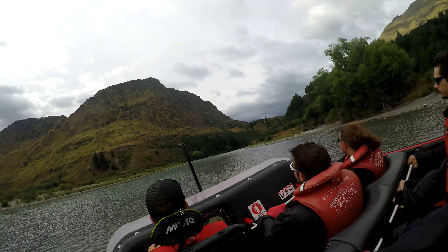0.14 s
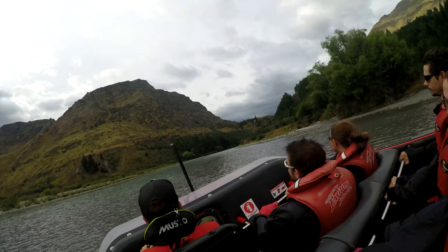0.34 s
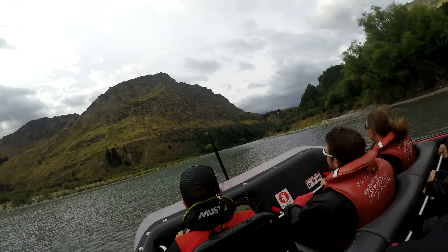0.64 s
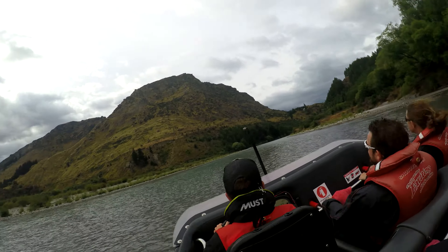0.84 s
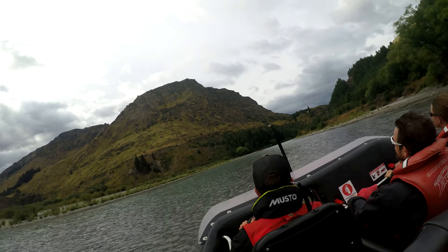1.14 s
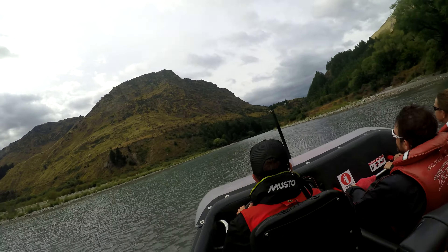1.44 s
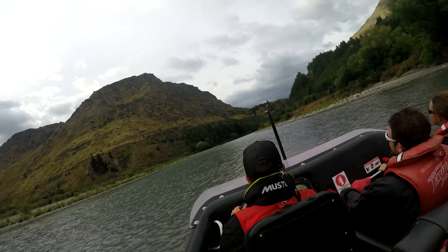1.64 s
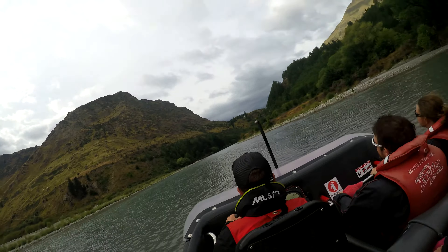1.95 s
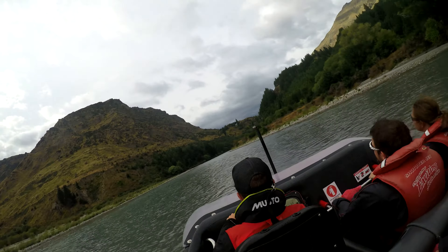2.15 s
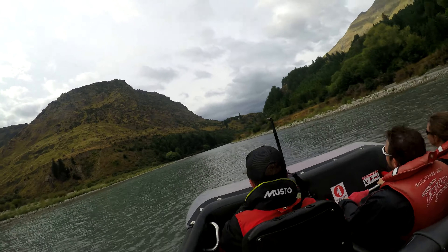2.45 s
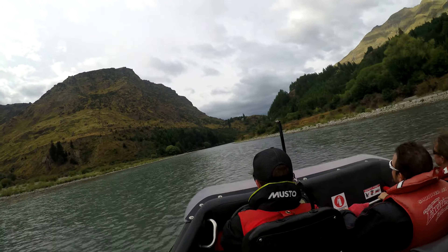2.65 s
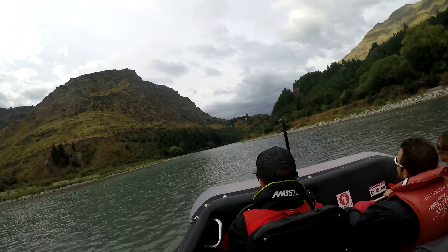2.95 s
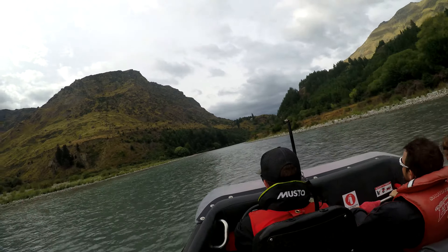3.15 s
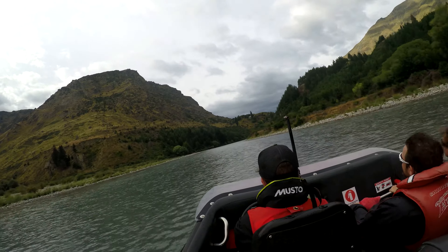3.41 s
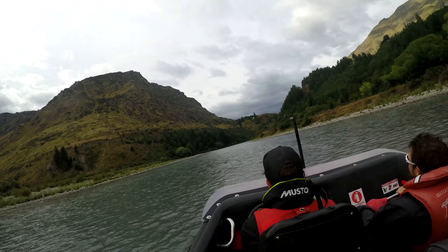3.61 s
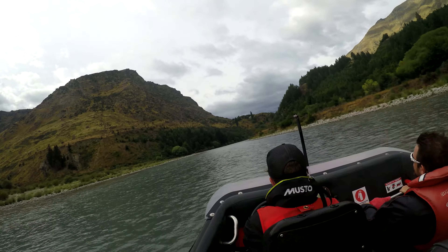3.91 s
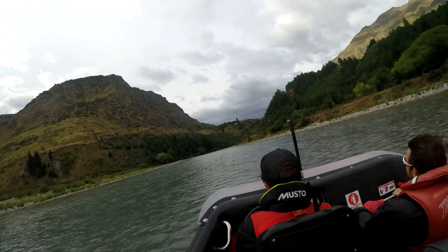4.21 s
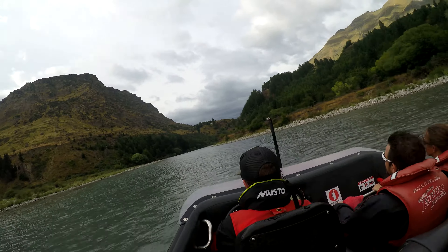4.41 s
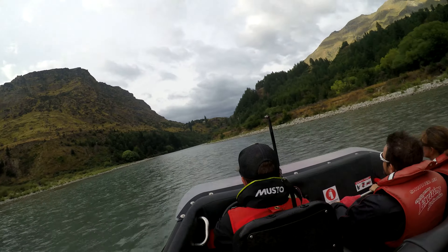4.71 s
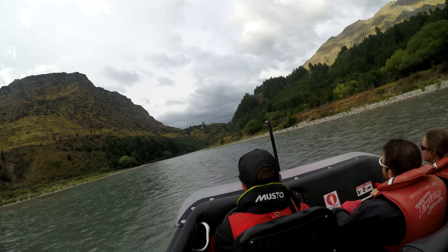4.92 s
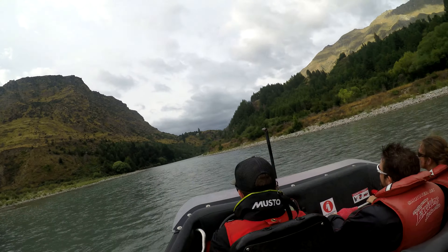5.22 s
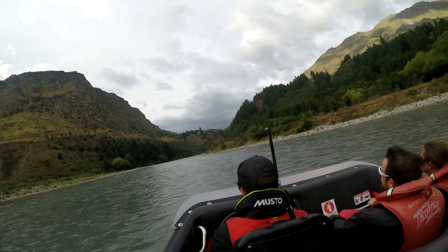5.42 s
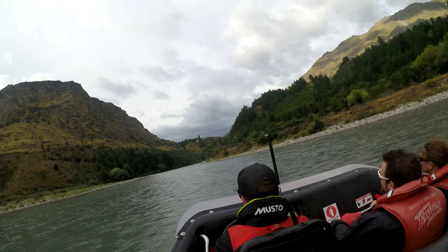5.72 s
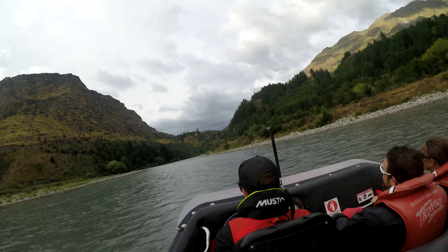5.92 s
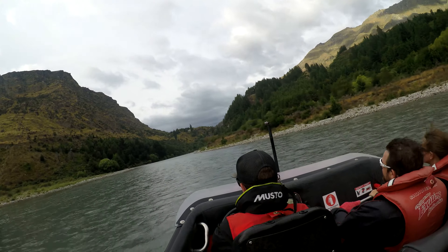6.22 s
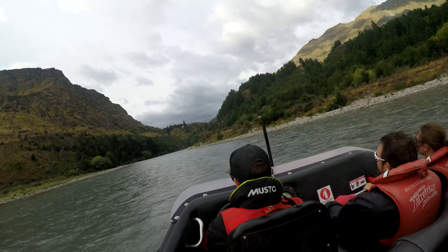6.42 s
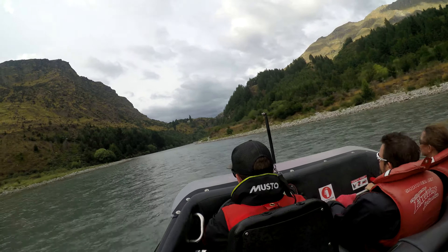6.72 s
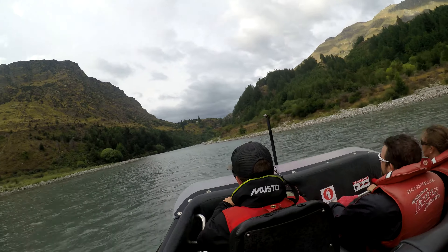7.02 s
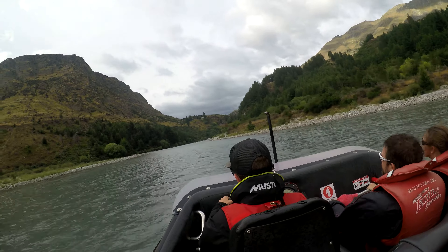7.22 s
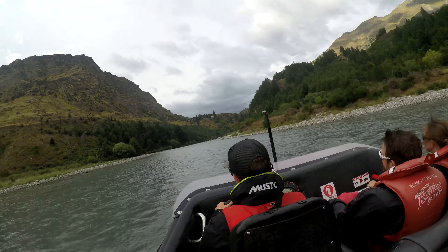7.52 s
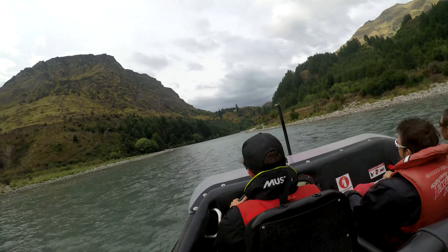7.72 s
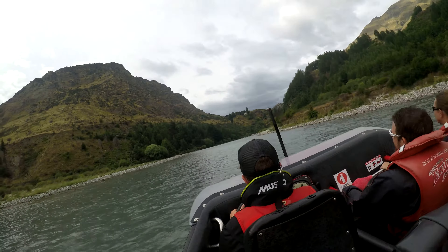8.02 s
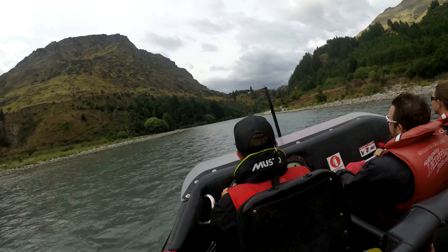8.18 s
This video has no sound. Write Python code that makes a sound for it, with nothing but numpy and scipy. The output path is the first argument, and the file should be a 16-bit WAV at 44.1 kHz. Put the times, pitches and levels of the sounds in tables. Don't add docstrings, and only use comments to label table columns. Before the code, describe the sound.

A boxed camera microphone near a boat engine is battered by headwind on open water. Low thumps and irregular slaps never stop, while breathy hiss first stutters with a thin high whistle, then streams evenly with frequent hollow pops, and finally breaks up and fades. A steady low engine drone swells mid-way behind it, with dull rushing water. Mono, close, slightly squashed by limiting.

```python
import sys
import numpy as np
from scipy import signal
from scipy.fft import rfft, irfft, next_fast_len
from scipy.io import wavfile
from scipy.ndimage import uniform_filter1d, minimum_filter1d, map_coordinates

SR = 44100
rng = np.random.default_rng(int(sys.argv[2]) if len(sys.argv) > 2 else 0)


def store_wav(level_fs):
    pcm = np.round(np.clip(np.atleast_2d(level_fs), -1, 1) * 32767)
    wavfile.write(sys.argv[1], SR, pcm.T.astype(np.int16))


def natural_amplitude(level_db):
    exponent = np.asarray(level_db, float) / 20
    return 10 ** exponent


N = 368235

# (time [s], thump level [dB])
HEADWIND = [(0, -14), (1.6, -13.5), (1.8, -17), (2.25, -15.5), (2.65, -18.5), (3.5, -15), (4.1, -17),
            (4.4, -14), (5.1, -15.5), (5.8, -13), (7.2, -13.5), (8.35, -14.5)]
# (time [s], length [s], change [dB])
SLACKS = [(1.61, 0.03, -1), (2.48, 0.057, -7), (3.77, 0.056, -7), (3.91, 0.059, -2.5), (4.23, .08, -4.5),
          (4.37, 0.032, -5), (4.49, 0.033, -8), (4.772, 0.062, -8), (5.32, .05, -8), (5.445, 0.035, -13),
          (5.53, 0.029, -8), (5.743, 0.02, -5.5), (5.912, 0.092, -11), (6.121, 0.041, -10.5),
          (6.23, 0.036, -6), (7.92, .04, -4), (8.026, 0.035, -14), (8.231, 0.025, -6)]
# (frequency [Hz], density [dB per Hz])
THUMP_SPECTRUM = [(8, -2), (20, 0.5), (36, 7.5), (60, 5.5), (90, -3), (150, -18.5), (300, -62.5),
                  (1000, -120)]
# (frequency [Hz], gain [dB])
THUMP_TOP = [(100, -6.5), (200, 0), (1000, -65)]
# (frequency [Hz], density [dB per Hz])
FLAP_SPECTRUM = [(50, -19.5), (90, -0.5), (150, -4.5), (250, -9), (350, -16.5), (600, -24.5), (1500, -35.5),
                 (5000, -120)]

# (time [s], hiss level [dB])
STREAM = [(0.0, -29.5), (0.5, -30), (0.75, -31.5), (1.0, -29), (1.25, -34), (1.5, -30.5), (2.0, -30.5),
          (2.24, -28.5), (2.49, -31), (3.0, -29.5), (4.24, -29), (4.49, -26), (4.74, -27), (5.49, -27.5),
          (6.49, -30), (7.73, -30), (7.98, -38.0), (8.3, -42.5)]
# (time [s], length [s], change [dB])
LULLS = [(0.073, 0.014, -7.5), (0.156, 0.037, -15), (0.224, 0.044, -10), (0.315, 0.029, -6),
         (0.427, 0.04, -5), (0.526, 0.027, -8.3), (0.732, 0.062, -10), (0.994, 0.015, -13),
         (1.019, 0.037, -8.9), (1.123, 0.055, -9.5), (1.233, 0.042, -12), (1.296, 0.023, -4.5),
         (1.337, 0.039, -10), (1.426, 0.015, -6), (1.542, 0.014, -8.5), (3.762, 0.018, -6.5),
         (0.664, 0.045, -4.5), (6.074, 0.016, -6.5), (6.487, 0.012, -7), (6.878, 0.014, -17),
         (7.174, 0.021, -10), (7.259, 0.037, -12), (7.355, 0.028, -7.5), (7.445, 0.086, -15.5),
         (7.742, 0.012, -5), (7.774, 0.015, -12), (7.827, 0.031, -9), (7.921, 0.045, -14),
         (7.975, 0.097, -9.5), (8.16, 0.083, -6)]
# (time [s], length [s], rise [dB])
GUSTS = [(0.62, 0.032, 6.5), (0.718, 0.019, 5), (0.775, 0.018, 12), (0.864, 0.07, 6), (1.212, 0.023, 8.5),
         (1.32, 0.0045, 4), (1.373, 0.017, 5.5), (1.458, 0.018, 4), (2.103, 0.0088, 6), (3.1, 0.043, 2.5),
         (4.326, 0.041, 4), (7.486, 0.023, 15.5), (7.698, 0.0077, 10), (7.773, 0.016, 7.5),
         (7.855, 0.019, 11.5), (7.96, 0.026, 6), (8.07, 0.015, 6.5), (8.138, 0.0076, 14.5),
         (8.279, 0.028, 10)]
# (frequency [Hz], density [dB per Hz])
HISS_SPECTRUM = [(150, -4.5), (350, 3.5), (700, -1.5), (1100, -3), (2200, -4.5), (2600, -10), (4000, -12.5),
                 (6000, -16.5), (6500, -23.5), (8050, -29.5), (11600, -40.5), (12700, -41), (14100, -44),
                 (15000, -55)]
# (frequency [Hz], width [Hz], gain [dB])
SHELL_MODES = [(1410, 68, 7), (1735, 213, 4), (2096, 114, 2.5), (3250, 400, 1.5), (5730, 380, 0.5),
               (7160, 720, 5), (8300, 300, -14)]
# (time [s], gain [dB])
SLOT_GAIN = [
    (0, 11.5),
    (1.05, 8.5),
    (1.4, 7.5),
    (2, 5),
    (5, 6),
    (7, 5.5),
    (7.6, 11),
    (7.9, 9),
    (8.35, 8),
]
# (frequency [Hz], width [Hz])
SLOT_MODE = (4810, 265)
# (frequency [Hz], width [Hz], gain [dB])
RIM_MODES = [(4410, 147, 4.5), (5390, 245, 5)]

# (frequency [Hz], width [Hz])
CAVITY = (920, 46.5)
# (time [s], peak level [dB], pitch [Hz], length [s])
PUFFS = [(0.251, -17.5, 918, 0.044), (0.893, -16, 915, 0.014), (1.099, -11.5, 929, 0.017),
         (1.449, -10.5, 909, 0.0091), (1.57, -15, 925, 0.031), (1.668, -11, 930, 0.0084),
         (3.088, -9.5, 870, 0.0063), (3.426, -8.5, 908, 0.013), (3.851, -12, 920, 0.021),
         (3.903, -14, 914, 0.024), (4.138, -14.5, 908, 0.011), (4.282, -5, 887.5, 0.0059),
         (4.409, -12.5, 930, 0.015), (4.902, -11.5, 915, 0.014), (4.967, -14, 915, 0.035),
         (5.114, -13.5, 880, 0.009), (5.202, -12, 881, 0.011), (5.272, -12, 914, 0.01),
         (5.476, -8.5, 892, 0.0072), (5.774, -8.5, 917, 0.011), (5.837, -8.5, 895, 0.0088),
         (5.917, -11, 915, 0.0073), (6.036, -12.5, 910, 0.011), (6.261, -11.5, 929, 0.01),
         (6.345, -10, 920, 0.0076), (6.514, -14.5, 942, 0.021), (6.753, -10.5, 903, 0.0079),
         (6.802, -11, 925, 0.01), (7.037, -15.5, 914, 0.034), (7.758, -11.5, 904, 0.0082)]
# (time [s], peak level [dB], pitch [Hz], length [s])
FLECKS = [
    (0.844, -18, 1464, .015),
    (2.192, -20.5, 1410, .015),
    (3.369, -16, 1730, 0.013),
    (7.54, -22.5, 1424, 0.019),
]
# (time [s], peak level [dB])
WHIFFS = [(.36, -23), (.44, -17), (2.553, -16.5), (2.702, -26), (3.19, -27), (3.265, -15), (3.371, -15),
          (3.463, -18), (3.725, -18), (4.213, -18), (4.33, -17), (4.519, -14), (4.558, -14.5), (4.617, -16),
          (4.79, -18), (4.848, -15.5), (5.163, -13), (5.234, -14), (5.357, -14), (5.394, -15.5),
          (5.709, -16.5), (5.957, -16.5), (6.154, -15), (6.309, -14.5), (6.988, -16.5), (7.414, -13.5),
          (7.472, -16), (7.655, -24), (7.693, -18), (7.898, -16)]

# (time [s], shaft rate [Hz], level [dB])
ENGINE = [
    (0, 67.5, -32),
    (1, 67.7, -29.5),
    (2, 67.13, -28.5),
    (3, 67.24, -24.5),
    (4, 66.6, -27),
    (5, 66.54, -28.5),
    (6, 67, -30.5),
    (7, 66.5, -38),
    (8.35, 66.63, -30),
]
# (multiple of shaft rate, level [dB])
SHAFT_ORDERS = [(.5, 7.5), (1, 3), (1.5, -6.5), (2, -1), (3, -7.5), (3.5, -9), (4, -10), (5, -21.5),
                (7, -13)]
# (frequency [Hz], density [dB per Hz])
ROAR_SPECTRUM = [(200, -11.5), (400, -7), (1000, -11), (2000, -9), (2600, -20.5), (5000, -30.5),
                 (7000, -42), (10000, -39.5), (15000, -70)]
# (frequency [Hz], density [dB per Hz])
SELF_NOISE_SPECTRUM = [(3000, -30), (7000, 1), (11000, -4), (13500, -9), (15000, -20)]
# (time [s], peak level [dB], pitch [Hz])
JOLTS = [(0.116, -8, 161), (0.281, -8.5, 188), (0.612, -3.5, 165), (1.09, -4, 145), (1.214, -2, 141),
         (1.444, -12, 118), (1.6, -4.5, 111), (2.096, -5.5, 109), (2.264, -3, 175), (2.884, -3.5, 159),
         (3.157, -5, 145), (3.264, -5.5, 135), (3.368, -3, 168), (3.423, -8.5, 123), (3.54, -4, 178),
         (3.78, -6, 110), (3.846, -7, 157), (4.273, -6, 188), (4.323, -0.5, 202), (5.36, -4, 245),
         (5.474, -0.5, 146), (5.945, -5.5, 121), (6.297, -6, 118), (6.755, -6, 146), (6.895, -4, 132),
         (6.973, -1.5, 111), (7.15, -4, 100), (7.442, -13, 150), (7.585, -3.5, 126), (7.687, -1.5, 137)]


def unit(x):
    return x / np.sqrt(np.mean(x ** 2) + 1e-20)


def curves(rows):
    s, *cols = np.transpose(rows)
    return [np.interp(np.arange(N) / SR, s, c) for c in cols]


def wobble(rate):
    knots = rng.standard_normal(int(N * rate / SR) + 4)
    return map_coordinates(knots, [np.arange(N) * rate / SR])


def filtered(x, response):
    m = next_fast_len(N + SR // 2)
    return irfft(rfft(x, m) * response(np.fft.rfftfreq(m, 1 / SR)), m)[:N]


def colour(points):
    f, db = np.transpose(points)
    return lambda hz: natural_amplitude(np.interp(np.log(hz + 1), np.log(f + 1), db))


def mode(hz, width_hz):
    return lambda f: 1j * f * width_hz / (hz * hz - f * f + 1j * f * width_hz)


def patchy(depth_db):
    z = signal.stft(rng.standard_normal(N), nperseg=512)[2]
    field = uniform_filter1d(rng.standard_normal(z.shape), 6, 0)
    field = uniform_filter1d(field, 6, 1)
    return signal.istft(z * natural_amplitude(depth_db * unit(field)), nperseg=512)[1][:N]


def headwind():
    t = np.arange(N) / SR
    level_db = curves(HEADWIND)[0]
    for s, length, db in SLACKS:
        level_db = level_db + db * np.interp(t, [s - length, s, s + length], [0, 1, 0])
    return level_db


def buffet(lumps):
    thump_db = headwind()
    mean_db = thump_db.mean()
    flap_db = mean_db - 6.5 + 0.8 * (thump_db - mean_db) + 1.2 * wobble(14)
    push = unit(filtered(rng.standard_normal(N), colour(THUMP_SPECTRUM)))
    thump = unit(filtered(np.tanh(0.7 * push), colour(THUMP_TOP)))
    small_eddies = filtered(patchy(depth_db=2.0), colour(FLAP_SPECTRUM))
    flap = unit(natural_amplitude(2.0 * lumps + 2.8 * wobble(70)) * small_eddies)
    return natural_amplitude(thump_db + 0.54 * lumps) * thump + natural_amplitude(flap_db) * flap


def eddies():
    t, change_db = np.arange(N) / SR, np.zeros(N)
    for s, length, db in LULLS:
        faded = s + 0.33 * length
        corners = [s - 0.006, faded, s + length - 0.003, s + length + 0.00092]
        change_db += db * np.interp(t, corners, [0, 1, 1, 0])
    for s, length, db in GUSTS:
        change_db += db * np.interp(t, [s - length, s, s + length], [0, 1, 0])
    return change_db


def hiss(eddy_db):
    turbulence = colour(HISS_SPECTRUM)

    def ringing(f, modes):
        return [(db, np.abs(mode(hz, width_hz)(f))) for hz, width_hz, db in modes]

    def shell_response(f):
        return turbulence(f) * np.sqrt(1 + sum((natural_amplitude(db) * ring) ** 2 for db, ring in ringing(f, SHELL_MODES)))

    def slot_response(f):
        return turbulence(f) * np.abs(mode(*SLOT_MODE)(f)) ** 2

    def rim_response(f):
        return turbulence(f) * sum(natural_amplitude(db) * ring ** 2 for db, ring in ringing(f, RIM_MODES))

    flutter_db = 0.42 * wobble(9) + 0.48 * wobble(30) + 1.37 * wobble(150)
    drive = natural_amplitude(eddy_db + flutter_db + curves(STREAM)[0]) * patchy(depth_db=0.88)
    slot_db = curves(SLOT_GAIN)[0]
    shell = filtered(drive, shell_response)
    slot = natural_amplitude(slot_db) * filtered(drive, slot_response)
    rim = natural_amplitude(2.5 * (6.0 - slot_db)) * filtered(drive, rim_response)
    return natural_amplitude(11.0) * (shell + slot + rim)


def puffs():
    pitch_spread_hz, length_s, return_db, lead_s = 18, 0.012, 8, 0.003065
    times, hiss_db = np.transpose(STREAM)
    ends = [s + length - lead_s for s, length, db in LULLS]
    light = WHIFFS + [(s, np.interp(s, times, hiss_db) + return_db) for s in ends]
    pitches = CAVITY[0] + pitch_spread_hz * rng.standard_normal(len(light))
    return PUFFS + FLECKS + [(s, db, hz, length_s) for (s, db), hz in zip(light, pitches)]


def cavity(eddy_db, lumps):
    stream_db = curves(STREAM)[0]
    blown = unit(filtered(rng.standard_normal(N), lambda f: np.abs(mode(*CAVITY)(f)) ** 1.42))
    whistle = unit(np.tanh(0.55 * blown))
    note_db = -30 + 0.48 * (stream_db - stream_db.mean()) + 1.3 * wobble(14)
    note_db += 0.9 * np.minimum(eddy_db, 4) + 1.15 * lumps
    ringing, t = np.zeros(N + SR), np.arange(SR // 8) / SR
    for s, db, hz, length in puffs():
        swell = np.clip(t / 0.0068, 0, 1) ** 2.6
        decay = natural_amplitude(-60 * np.maximum(t - length, 0) / 0.041)
        tone = np.sin(2 * np.pi * hz * t + rng.uniform(0, 2 * np.pi))
        start = max(round((s - 0.003) * SR), 0)
        ringing[start:][:len(t)] += natural_amplitude(db - 1.5) * swell * decay * tone
    return filtered(natural_amplitude(note_db) * whistle + ringing[:N], lambda f: 1 / (1 + (f / 1900) ** 6))


def engine():
    shaft_hz, level_db = curves(ENGINE)
    turn = 2 * np.pi * np.cumsum(shaft_hz * (1 + 0.00293 * wobble(4))) / SR
    hum = np.zeros(N)
    for multiple, db in SHAFT_ORDERS:
        hum += natural_amplitude(db + 2.5 * wobble(5)) * np.sin(multiple * turn + rng.uniform(0, 2 * np.pi))
    return natural_amplitude(level_db) * hum


def water():
    level_db = -36.0
    swell = natural_amplitude(0.7 * wobble(3))
    return natural_amplitude(level_db) * swell * unit(filtered(patchy(depth_db=1.5), colour(ROAR_SPECTRUM)))


def self_noise():
    level_db = -67
    return natural_amplitude(level_db) * unit(filtered(rng.standard_normal(N), colour(SELF_NOISE_SPECTRUM)))


def jolts():
    out, t = np.zeros(N + SR), np.arange(SR // 16) / SR
    for s, db, hz in JOLTS:
        sign = np.sign(rng.standard_normal())
        onset = 1 - np.exp(-t / 0.0011)
        decay = natural_amplitude(-60 * t * hz / 6)
        push = onset * decay * np.sin(2 * np.pi * hz * t)
        out[round(s * SR):][:len(t)] += sign * natural_amplitude(db + 2.0) * push
    return filtered(out[:N], lambda f: 1 / (1 + (f / 900) ** 4))


def scene():
    eddy_db = eddies()
    lumps = wobble(22)
    wind = buffet(lumps) + hiss(eddy_db + 0.3 * lumps) + cavity(eddy_db, lumps) + jolts()
    return (wind + engine() + water() + self_noise())[None]


def low_pass(x):
    return signal.sosfilt(signal.butter(12, 15020, fs=SR, output="sos"), x)


def record(dry):
    need = np.minimum(1, 0.89 / (np.abs(dry) + 1e-9))
    held = minimum_filter1d(need, size=441, axis=1)
    gain = uniform_filter1d(held, size=441, axis=1)
    return low_pass(dry * gain)


dry = scene()
out = record(dry)
store_wav(out)
```